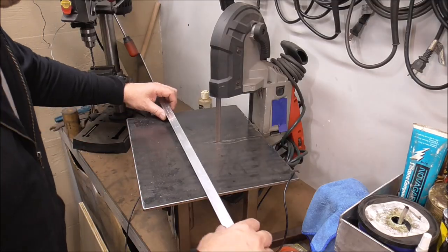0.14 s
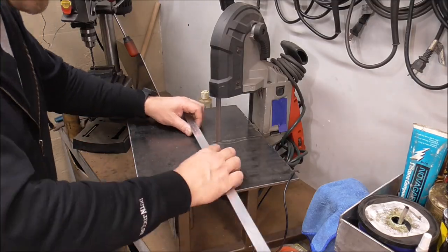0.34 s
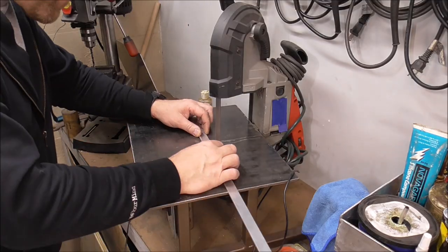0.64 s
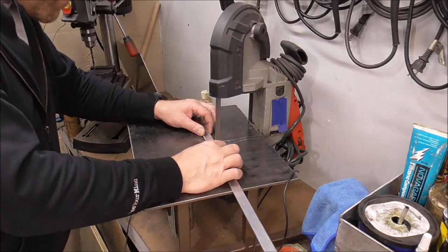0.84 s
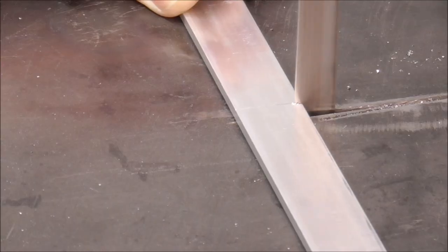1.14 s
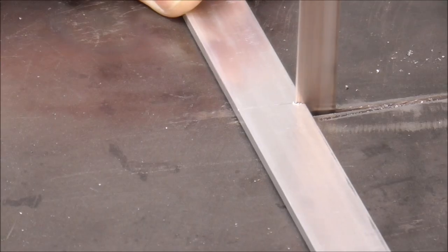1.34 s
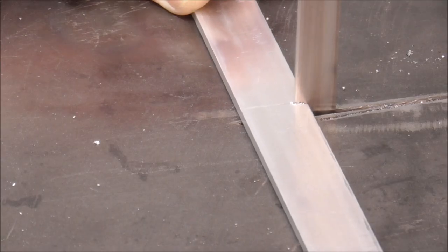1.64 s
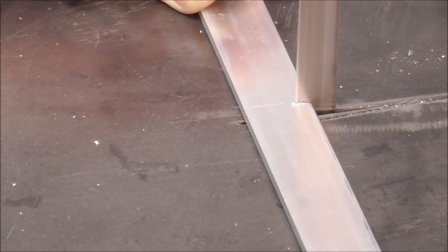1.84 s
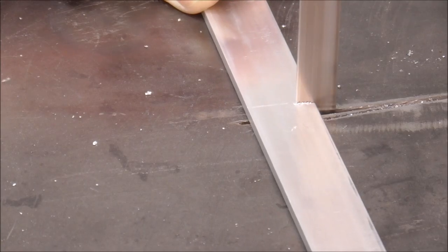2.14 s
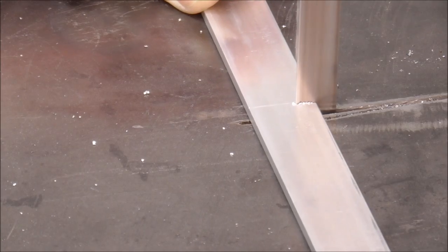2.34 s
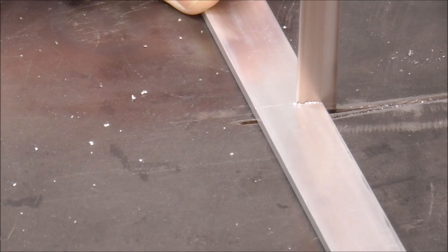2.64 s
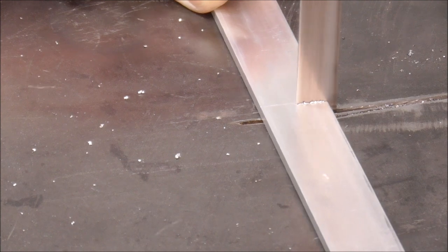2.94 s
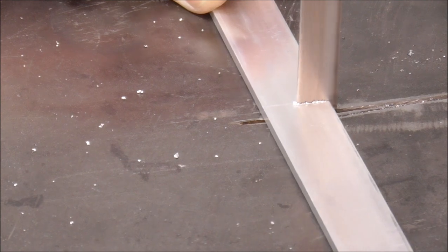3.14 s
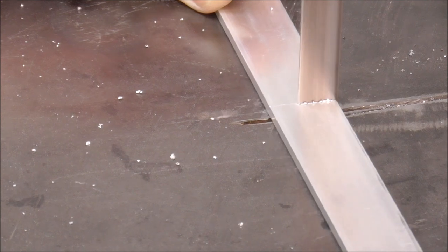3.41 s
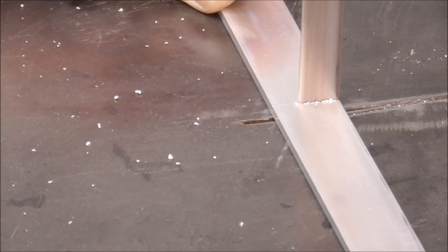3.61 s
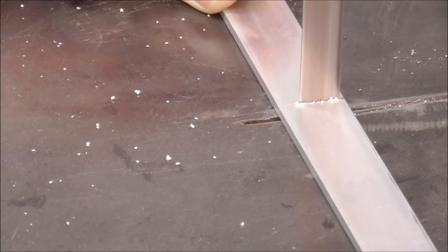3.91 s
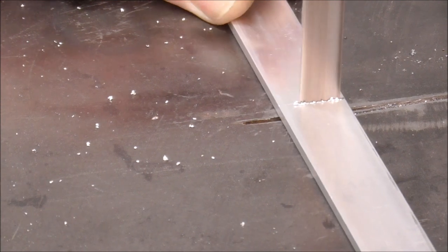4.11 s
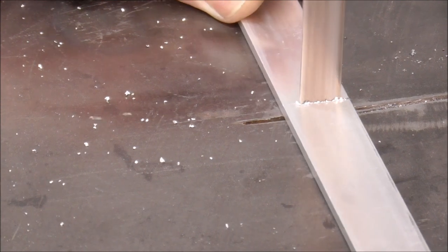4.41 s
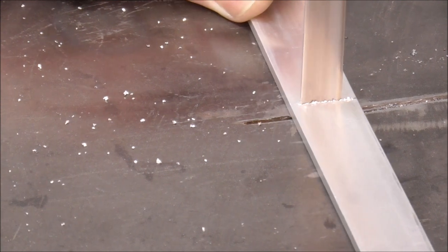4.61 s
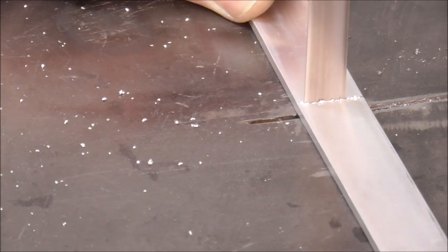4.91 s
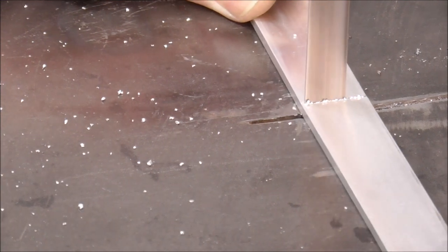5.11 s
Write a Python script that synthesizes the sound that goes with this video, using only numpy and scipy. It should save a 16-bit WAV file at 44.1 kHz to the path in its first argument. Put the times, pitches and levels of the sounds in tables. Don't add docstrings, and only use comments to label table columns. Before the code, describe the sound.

In a workshop, a small electric bandsaw runs free for about a second: hollow housing noise, airy hiss and gear whine, fairly wide and a step back. A faint low bump marks an instant change to a close, almost mono view, where teeth rasp continuously through a flat aluminum bar. The bar rings harshly, chips hiss brightly, and dull table knocks repeat in a lap pattern until the end.

```python
import sys
import numpy as np
from scipy import signal
from scipy.fft import rfft, irfft, next_fast_len
from scipy.io import wavfile
from scipy.ndimage import uniform_filter1d, map_coordinates

SR = 44100
rng = np.random.default_rng(int(sys.argv[2]) if len(sys.argv) > 2 else 0)


def dump(signal):
    limited = np.clip(np.atleast_2d(signal).T, -1, 1)
    pcm = np.round(limited * 32767).astype(np.int16)
    wavfile.write(sys.argv[1], SR, pcm)


def to_linear_factor(level_db):
    exponent = np.asarray(level_db, float) / 20
    return 10 ** exponent


N = 231726
T = np.arange(N) / SR
CUT_S = 1.0185
LAP_S = 0.4162
LAPS = range(2, int(N / SR / LAP_S) + 1)

# start_s, pressure_db, looseness (how far proud teeth shake it)
HAND_FEED = [(1.03, 1.5, 0.6), (1.24, -1, 0.87), (1.3, -1, 1.5), (1.75, -1, 1.4), (1.97, 0.5, 0.44),
             (2.2, -1.5, 1.2), (2.45, -1.5, 1.5), (2.6, 0.5, 0.89), (3.0, -1.5, 0.96), (3.25, 0.5, 1.2),
             (3.45, -0.5, 1.1), (3.65, 2, 1.1), (3.78, -1, .7), (4.1, 2, .6), (4.3, 0, .5),
             (4.5, 1.5, 0.65), (4.7, -0.5, 1.7), (5.25, -2, 1.1)]


def feed():
    pressure_db, looseness = curves(HAND_FEED)
    weld_place, lap_rise_db = 0.98, 1.37
    lap_ramp = (T / LAP_S - weld_place) % 1 - 0.5
    return pressure_db + lap_rise_db * uniform_filter1d(lap_ramp, size=600), looseness


# place_lap (0-1), length_ms, bite_db
PROUD_TEETH = [(.15, 16, 1.5), (.335, 16, 1.5), (.48, 18, 0.5), (.7, 28, 1.2), (.895, 25, 1.5)]
# center_s, length_ms, change_db
EXTRA_BITES = [(1.072, 28, 0.5), (1.243, 8, 3.5), (1.285, 45, -3), (1.312, 20, 1.5), (1.63, 28, 2),
               (1.868, 25, 1.5), (1.96, 20, 1.5), (2.141, 15, 4), (2.19, 57, -3), (2.295, 8.8, 3),
               (2.372, 35, 2.5), (2.425, 42, -4), (2.468, 25, 2), (2.596, 14, 1.5), (2.8, 40, 1.5),
               (2.87, 20, 1.5), (2.947, 24, -1.5), (3.01, 10, 2), (3.225, 19, 2.5), (3.388, 8.2, 3.5),
               (3.629, 30, 2), (3.706, 13, 1), (3.745, 47, -3.5), (4.166, 22, 0), (4.637, 7.5, 4.5),
               (4.724, 15, 4), (4.776, 9.2, 0), (4.869, 33, 2.5), (4.924, 48, -4), (5.138, 17, 4.5)]


def bites(looseness):
    laps = [((lap + place) * LAP_S, ms, db) for lap in LAPS for place, ms, db in PROUD_TEETH]
    return looseness * swells(*np.transpose(laps)) + swells(*np.transpose(EXTRA_BITES))


# freq_hz, density_db_per_hz
BAR_COLOUR = [(30, -90), (100, -79), (250, -30), (370, -21.5), (450, -8.5), (650, -8.5), (760, -12.5),
              (1100, -10.5), (1500, -7), (2500, -5.5), (3200, -10), (4000, -10.5), (5300, -23), (7000, -28)]
# freq_hz, width_hz, lift_db
BAR_RESONANCES = [(817, 25, 5), (941, 35, 6), (1244, 40, 3), (1385, 50, 4), (1532, 110, 3), (1785, 40, 4),
                  (1929, 32, 5), (2395, 60, 3), (2528, 60, 3), (2731, 45, 4), (3400, 80, 3), (3880, 70, 3),
                  (4103, 45, 5), (4300, 100, 2)]
# freq_hz, width_hz, lift_db
BAR_VALLEYS = [(477, 48, -11), (724, 17, -13), (1082, 31, -5), (1790, 45, -4), (3275, 250, -6.5)]
# freq_hz, density_db_per_hz
RING_COLOUR = [(1500, -65), (2300, -5), (2420, 1.5), (2530, 7.5), (2620, -3.5), (2800, -10.5), (4000, -23)]
# freq_hz, density_db_per_hz
CHIP_COLOUR = [(4000, -55), (5300, -15.5), (6500, -4.5), (7500, -1), (9500, 0.5), (11000, -3.5),
               (12500, -5), (13500, -21), (15000, -32)]
# freq_hz, width_hz, lift_db
BLADE_RESONANCES = [(5640, 60, 4), (6840, 80, 2), (7520, 70, 6), (7800, 30, 3), (8230, 90, 3),
                    (9600, 250, 4), (10050, 150, 3), (11820, 200, 3), (12980, 100, 3), (14600, 150, 2),
                    (15040, 100, 2)]
# freq_hz, density_db_per_hz
FIZZ_COLOUR = [(11000, -30), (13000, -7), (14000, -2.5), (14600, 0), (15000, -1.5), (16500, -2)]
# freq_hz, density_db_per_hz
STAND_COLOUR = [(30, -45), (90, -34), (123, -8.5), (155, -20), (205, -5), (240, -15), (330, -13.5),
                (410, -2.5), (470, 10), (515, -8), (700, -60)]
# freq_hz, side_minus_mid_db
CLOSE_WIDTH = [(60, -50), (300, -30), (550, -35), (800, -40), (2500, -29), (4000, -30), (13900, -30.5),
               (14500, -16), (15000, -19), (15300, -27), (16500, -28)]


def cutting():
    pressure_db, looseness = feed()
    bite_db = bites(looseness)
    deeper_s = T - CUT_S
    chatter = 0.2 * wobble(70) + 0.81 * wobble(200)

    def level(db, db_per_s, push, bite):
        return db + db_per_s * deeper_s + push * pressure_db + bite * bite_db

    rasp_db = level(-24.5, db_per_s=0.28, push=0.84, bite=0.72) + chatter
    ring_db = level(-32, db_per_s=0.33, push=1.34, bite=1.7) + 2.1 * wobble(30)
    hiss_db = level(-23, db_per_s=0.05, push=0.95, bite=1.04) + 1.3 * chatter + 0.13 * wobble(45)
    fizz_db = level(-22, db_per_s=-0.73, push=1.3, bite=1.1) + 1.1 * chatter
    knock_db = level(-39, db_per_s=0.67, push=0.16, bite=0.1)
    rumble_db = level(-52.5, db_per_s=1.2, push=-0.7, bite=0.6) + 1.2 * wobble(16)
    rumble_db = rumble_db + 0.3 * deeper_s * bite_db

    bar_modes = BAR_RESONANCES + BAR_VALLEYS
    rasp = to_linear_factor(rasp_db) * scrape(BAR_COLOUR, bar_modes, CLOSE_WIDTH, gritty_db=-1.0, patchy_db=1.12)
    ring = to_linear_factor(ring_db) * scrape(RING_COLOUR, [], CLOSE_WIDTH, gritty_db=0.5, patchy_db=1.0)
    hiss = to_linear_factor(hiss_db) * scrape(CHIP_COLOUR, BLADE_RESONANCES, CLOSE_WIDTH, gritty_db=0.67, patchy_db=1.0)
    fizz = to_linear_factor(fizz_db) * scrape(FIZZ_COLOUR, BLADE_RESONANCES, CLOSE_WIDTH, gritty_db=2.5, patchy_db=-1.5)
    rumble = to_linear_factor(rumble_db) * scrape(STAND_COLOUR, [], CLOSE_WIDTH, gritty_db=1.5, patchy_db=3.5)
    motor = whine(view=2, slow=0.003, quick=0.0008)
    return rasp + ring + hiss + fizz + rumble + to_linear_factor(knock_db) * knocks() + motor


SPOT_PLACES = [.0, .035, .14, .22, .33, .41, .49, .52, .6, .655, .7, .74, .83, .895, .97]
# length_ms, low_modes_db, middle_modes_db, upper_modes_db
SPOT_PUSHES = [(27.03, -5, -22, 9.5), (15.06, 0.5, -25, 2), (22.37, -13, 11, 10.5), (19.7, -9, -11, 2),
               (23.4, -16, 8, -25), (27.06, -11, 5, 7), (25.1, 6, -10, 11), (24.93, -12, 7.5, 7.5),
               (18.8, -40, -11, -8), (28.2, 9.5, -4, 9), (22.1, -9, 9, 4), (22.03, 2, 4, 10),
               (20.16, -1, 2.5, 9), (24.87, 3, 12, 10), (21.7, 3.5, 4.5, 8)]
# freq_hz, level_db, t60_s, push_column (0 low, 1 middle, 2 upper)
TABLE_MODES = [(198, -23, 0.12, 0), (290, -26, .04, 0), (340, -26, 0.035, 1), (417, -35, 0.049, 0),
               (455.8, -4, 0.088, 1), (572.6, -6, 0.097, 1), (620.6, 0, 0.059, 2)]


def knocks():
    out = np.zeros(N + SR)
    t = np.arange(SR // 6) / SR
    for lap in LAPS:
        for place, (length_ms, *push_db) in zip(SPOT_PLACES, SPOT_PUSHES):
            length_s = length_ms / 1000
            *mode_chances, time_chance = rng.standard_normal(len(TABLE_MODES) + 1)
            rise = np.sin(np.pi / 2 * np.clip(t / length_s, 0, 1)) ** 2
            ring = 0
            for (hz, db, t60_s, column), chance in zip(TABLE_MODES, mode_chances):
                mode_db = db + push_db[int(column + 0.5)] + 1.95 * chance - 60 * t / t60_s
                ring = ring + to_linear_factor(mode_db) * np.sin(2 * np.pi * hz * (1 + 0.0073 * chance) * t)
            start_s = (lap + place) * LAP_S - 0.7 * length_s + 0.001 * time_chance
            tail = out[round(start_s * SR):][:len(t)]
            tail += (rise * ring)[:len(tail)]
    return unit(out[:N])


# freq_hz, density_db_per_hz
HOUSING_COLOUR = [(30, -80), (100, -36), (200, -34.5), (350, -28.5), (450, -12), (600, -10.5), (800, -11.5),
                  (1200, -8), (1600, -9.5), (2400, -5), (3000, -12), (4500, -16.5), (5300, -22.5),
                  (7000, -40)]
# freq_hz, width_hz, lift_db
HOUSING_RESONANCES = [(203, 15, 7), (279, 33, 9), (610, 40, 7.5), (800, 30, 8.5), (946, 47, 8),
                      (1170, 18, 8.5), (1340, 40, -7), (1396, 26, 6), (1510, 116, 9), (1675, 12, 12),
                      (2456, 52, 5.5), (4400, 16, 6)]
# freq_hz, density_db_per_hz
BRUSH_COLOUR = [(4000, -51), (5300, -14.5), (6500, -4.5), (7500, -2), (9500, 1.5), (11000, -3.5),
                (13000, -5.5), (14500, -1.5), (16500, -4.5)]
# freq_hz, width_hz, lift_db
WHEEL_RESONANCES = [(5640, 40, 4), (7240, 70, 4), (7520, 80, 5), (7934, 40, 5), (8185, 40, 6),
                    (9527, 150, 4), (9817, 50, 5), (10250, 60, 3), (10670, 100, 3), (11537, 60, 4),
                    (12300, 60, 5), (12700, 200, -5), (13140, 50, 4), (15250, 80, 3)]
# freq_hz, side_minus_mid_db
BACK_WIDTH = [(60, -22), (110, -30), (200, -33), (380, -32), (520, -14.5), (1290, -10.5), (2380, -14),
              (4400, -19), (8120, -12), (15000, -4.5)]


def idling():
    flutter = wobble(60.3)
    housing = scrape(HOUSING_COLOUR, HOUSING_RESONANCES, BACK_WIDTH, gritty_db=0.9, patchy_db=-1.0)
    hiss = scrape(BRUSH_COLOUR, WHEEL_RESONANCES, BACK_WIDTH, gritty_db=0.5, patchy_db=1.3)
    noise = to_linear_factor(-29.8 + 0.5 * flutter) * housing + to_linear_factor(-27.5 + 0.71 * flutter) * hiss
    return noise + whine(view=1, slow=0.0012, quick=0.0012)


# order, idle_db, cutting_db
GEAR_ORDERS = [(1, -44, -43), (2, -49, -44), (3, -43.5, -40.5), (6, -50.5, -42), (11, -57, -51)]
# freq_hz, idle_db, cutting_db
MAINS_HUM = [(720, -60, -56), (2880, -64, -49), (3120, -55, -56)]


def whine(view, slow, quick):
    def tone(hz):
        return np.sqrt(2) * np.sin(2 * np.pi * np.cumsum(hz + 0 * T) / SR)

    mesh_hz = 682.3 * (1 + slow * wobble(8) + quick * wobble(40))
    gear = sum(to_linear_factor(row[view] + 1.5 * wobble(10)) * tone(row[0] * mesh_hz) for row in GEAR_ORDERS)
    hum = sum(to_linear_factor(row[view]) * tone(row[0]) for row in MAINS_HUM)
    return gear + hum


def thump(since_s):
    level_db, pitch_hz, t60_s = -39, 65, 0.04
    return to_linear_factor(level_db - 60 * since_s / t60_s) * np.sin(2 * np.pi * pitch_hz * since_s)


def scrape(colour, modes, width, gritty_db, patchy_db):
    grit = rng.standard_normal((2, N)) * to_linear_factor(gritty_db * wobble(900))
    z = signal.stft(grit, nperseg=512)[2]
    patches = uniform_filter1d(rng.standard_normal(z.shape[1:]), size=6, axis=0)
    patches = uniform_filter1d(patches, size=8, axis=1)
    pair = signal.istft(z * to_linear_factor(patchy_db * unit(patches)), nperseg=512)[1][:, :N]

    def body(hz):
        lift_db = sum(db / (1 + (2 * (hz - c) / w) ** 2) for c, w, db in modes)
        return to_linear_factor(along(colour, hz) + lift_db) * [hz ** 0, to_linear_factor(along(width, hz))]

    mid, side = filtered(pair, body)
    return np.array([mid + side, mid - side]) / np.std(mid)


def swells(center_s, length_ms, db):
    coarse_s = T[::64]
    bells = np.exp(-(2000 * (coarse_s - center_s[:, None]) / length_ms[:, None]) ** 2)
    return np.interp(T, coarse_s, db @ bells)


def wobble(rate_hz):
    return map_coordinates(rng.standard_normal(int(N * rate_hz / SR) + 4), [T * rate_hz])


def curves(rows):
    start_s, *columns = np.transpose(rows)
    return [np.interp(T, start_s, column) for column in columns]


def along(points, hz):
    f, value = np.transpose(points)
    return np.interp(np.log(hz + 1), np.log(f + 1), value)


def filtered(x, response):
    m = next_fast_len(N + 8192)
    return irfft(rfft(x, m) * response(np.fft.rfftfreq(m, 1 / SR)), m)[..., :N]


def unit(x):
    return x / np.sqrt(np.mean(x ** 2) + 1e-20)


def scene():
    since_s = np.maximum(T - CUT_S, 0)
    close = np.clip(since_s / 0.001, 0, 1)
    return (1 - close) * idling() + close * cutting() + thump(since_s)


def top_cut(x):
    return signal.sosfilt(signal.butter(12, 16190, fs=SR, output="sos"), x)


def record(dry):
    rounded = dry / (1 + np.abs(dry / 0.72) ** 6) ** (1 / 6)
    heard = filtered(rounded, lambda hz: (hz < 15760) / (1 + (85 / (hz + 1)) ** 3))
    return top_cut(heard)


dry = scene()
out = record(dry)
dump(out)
```